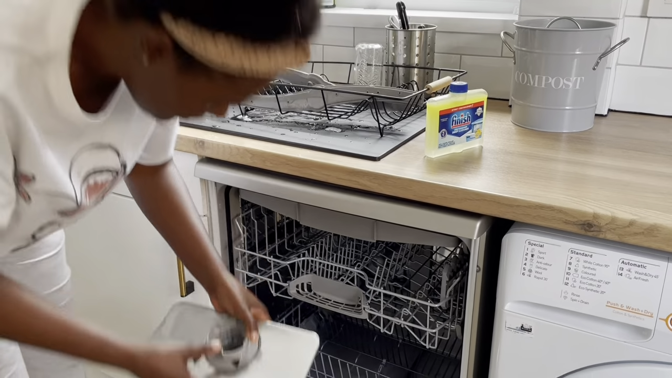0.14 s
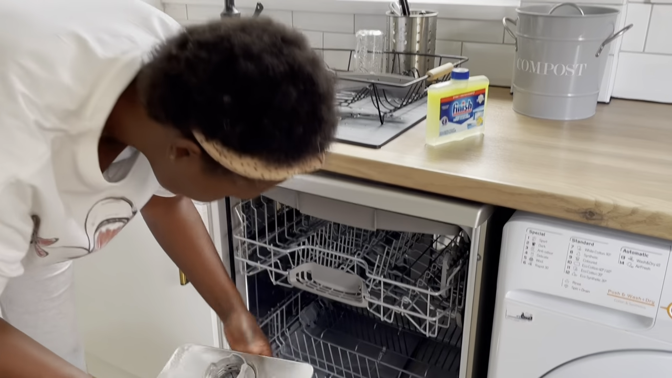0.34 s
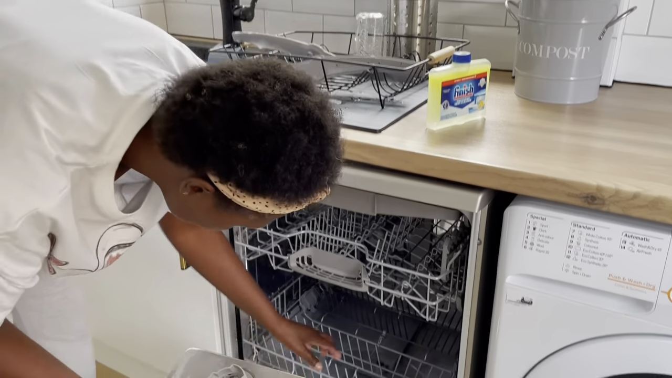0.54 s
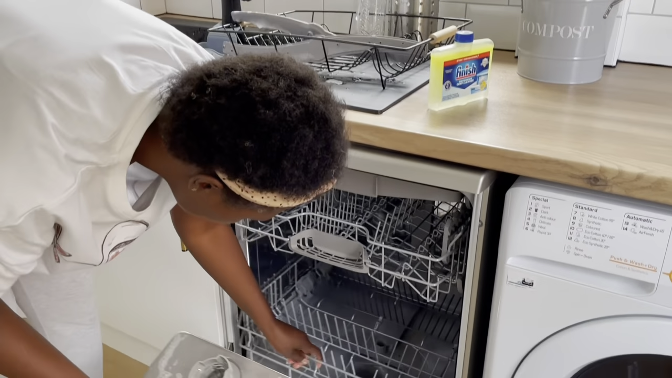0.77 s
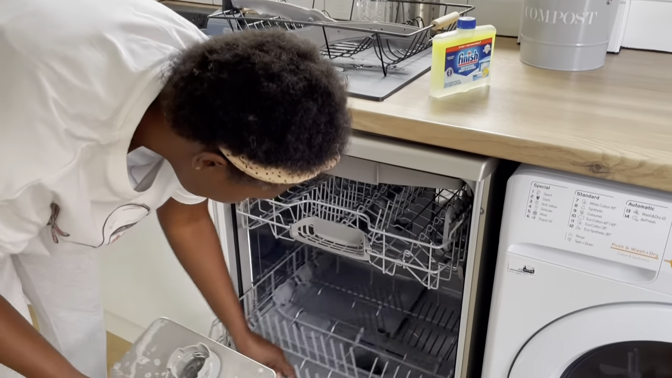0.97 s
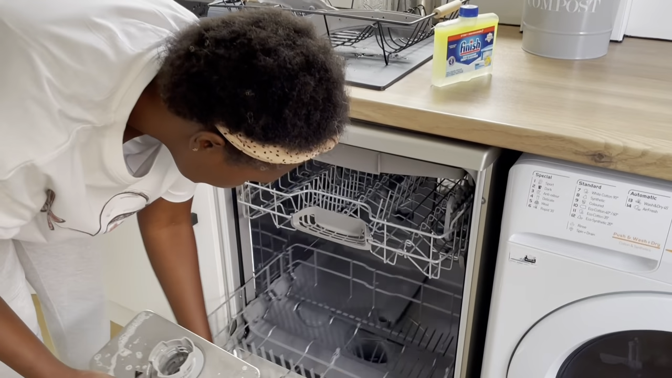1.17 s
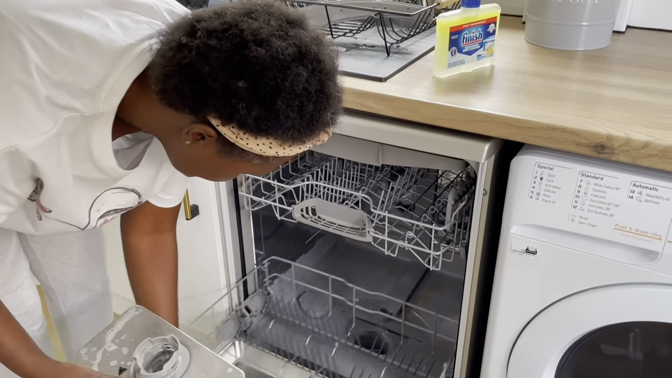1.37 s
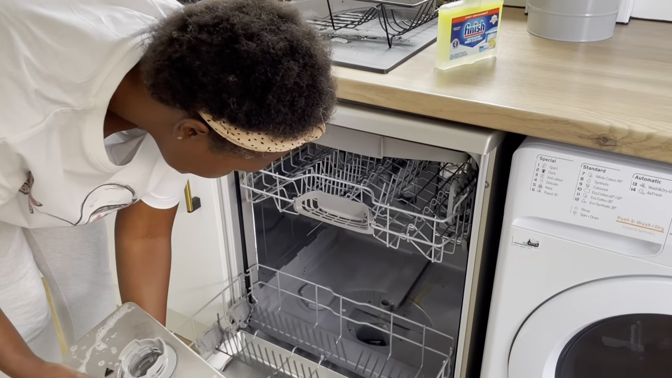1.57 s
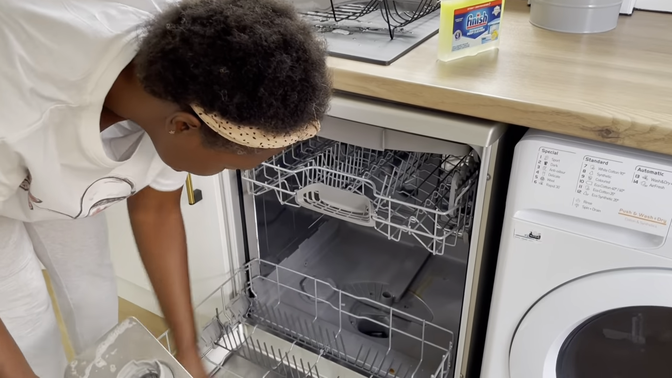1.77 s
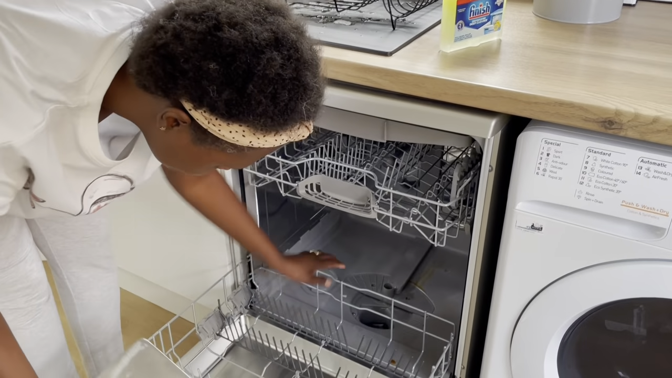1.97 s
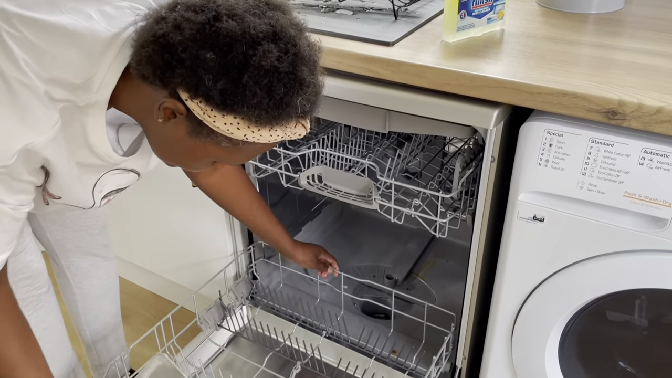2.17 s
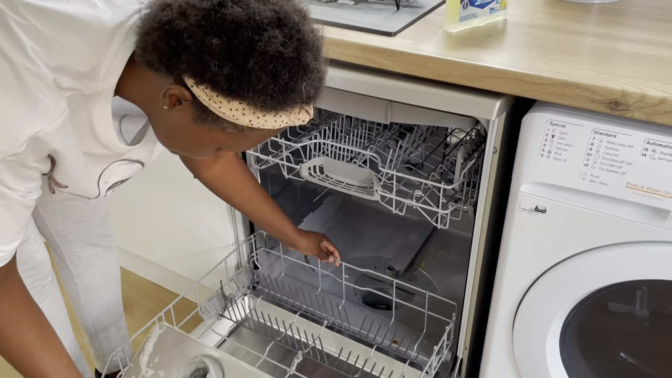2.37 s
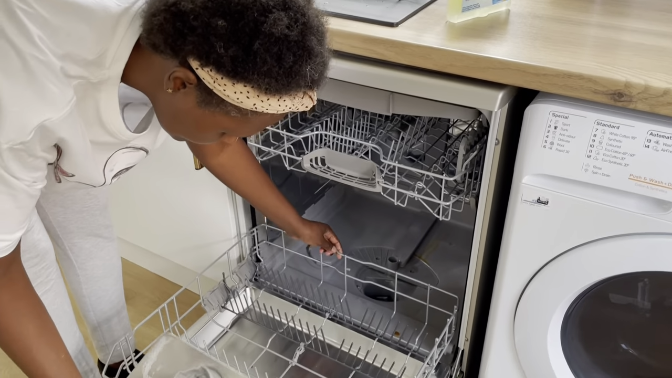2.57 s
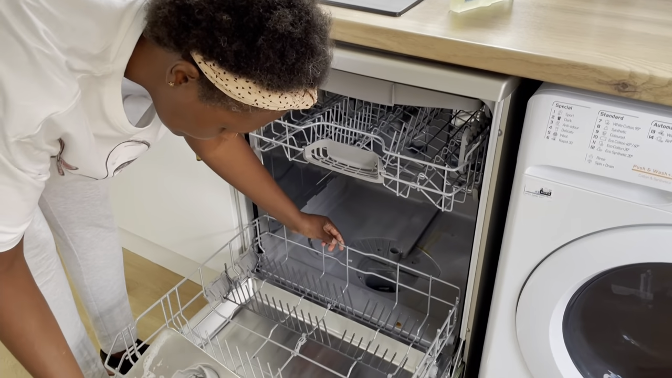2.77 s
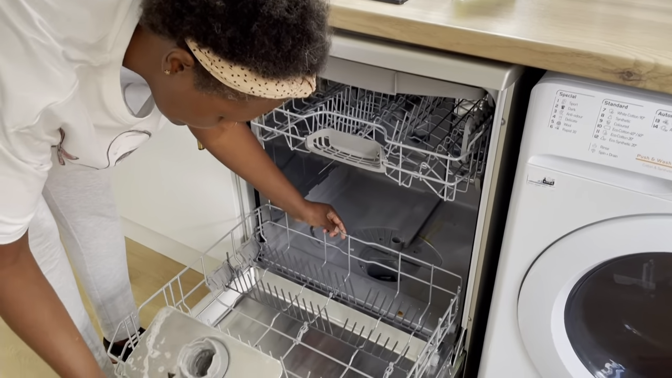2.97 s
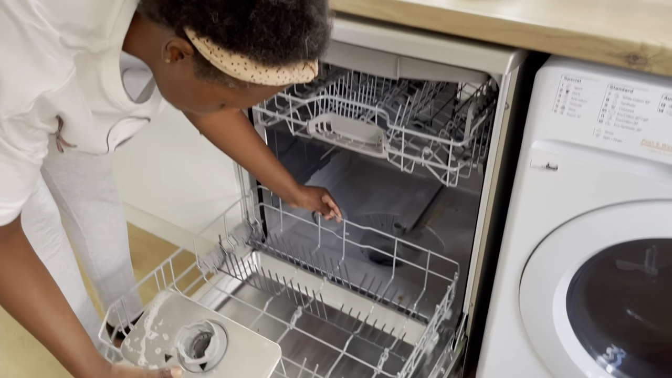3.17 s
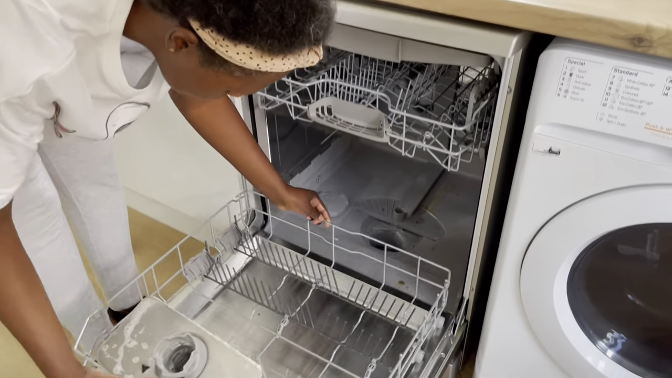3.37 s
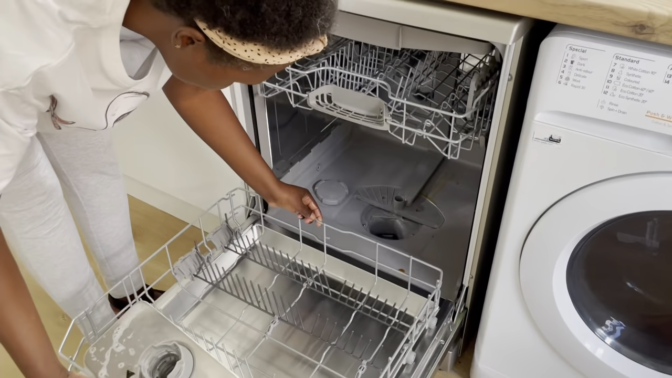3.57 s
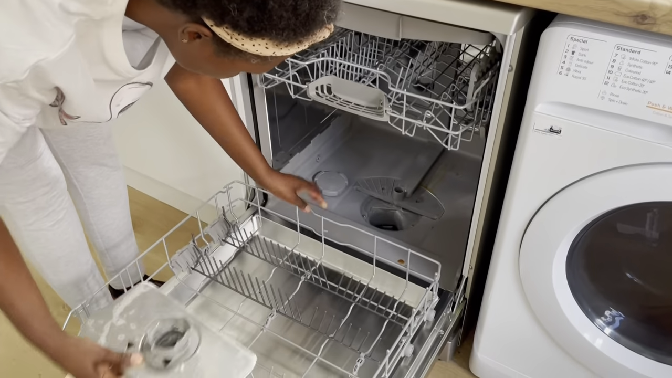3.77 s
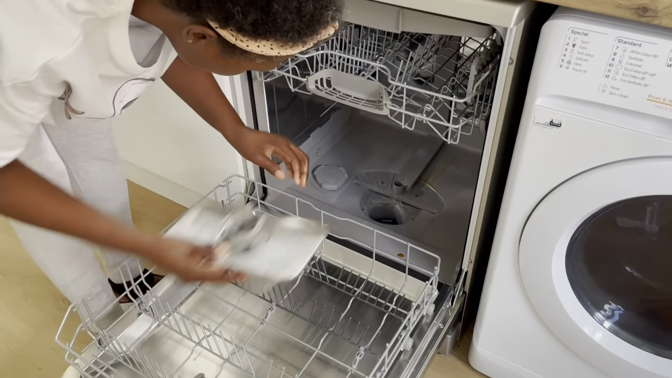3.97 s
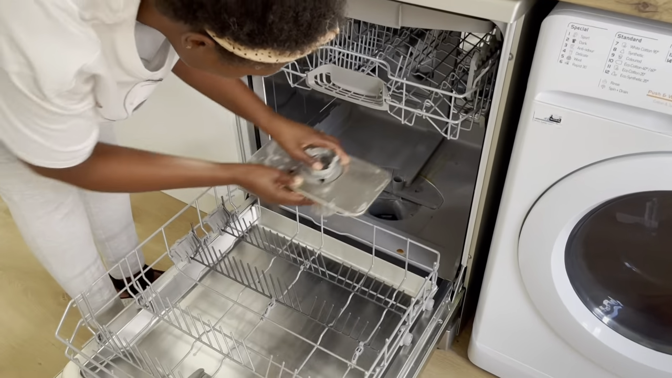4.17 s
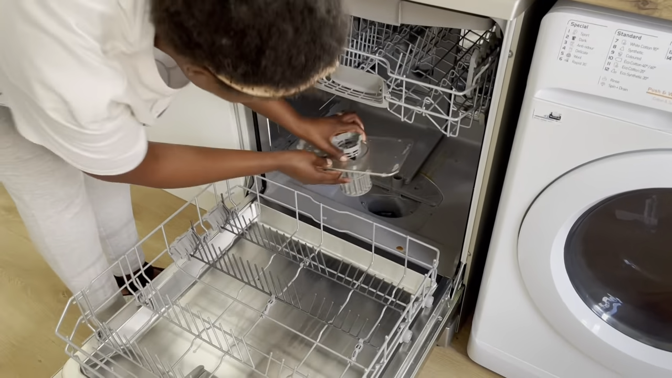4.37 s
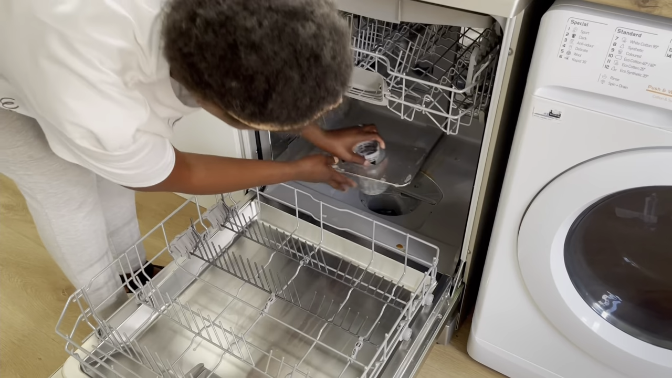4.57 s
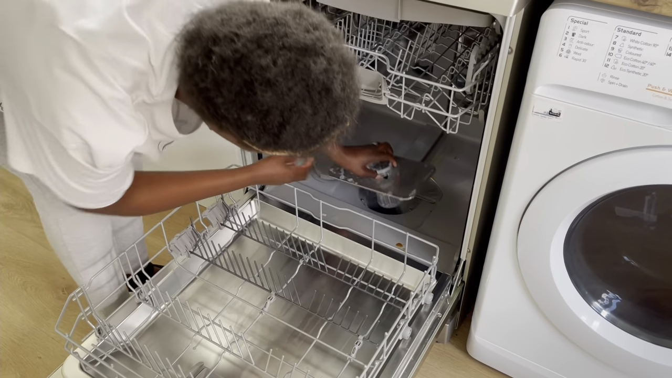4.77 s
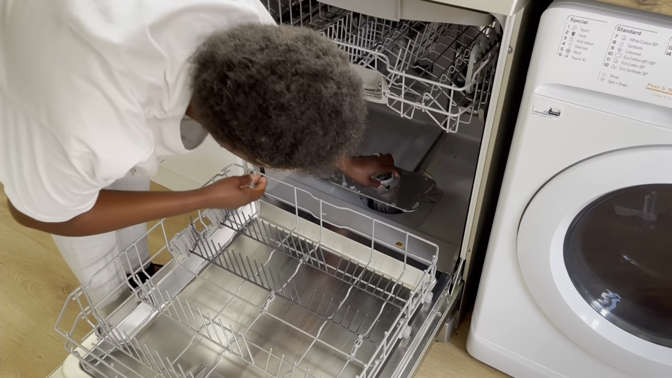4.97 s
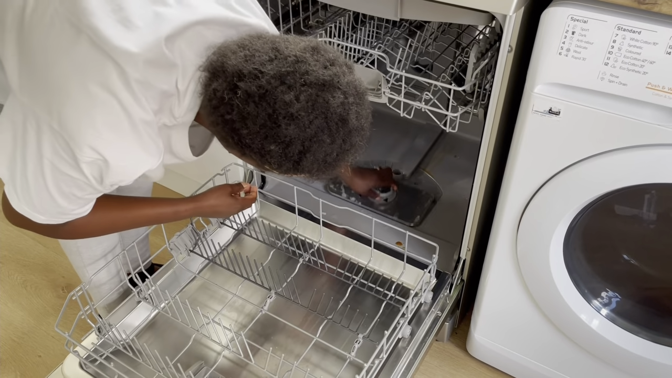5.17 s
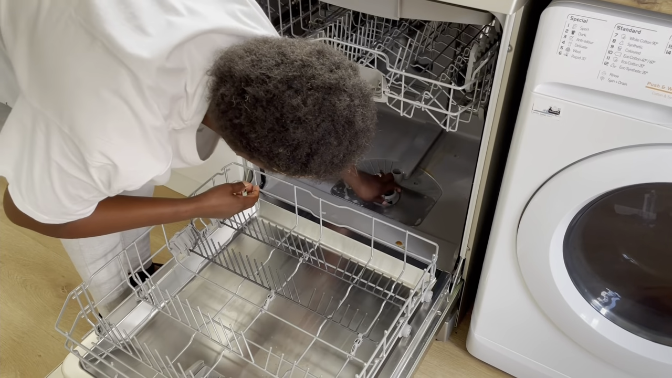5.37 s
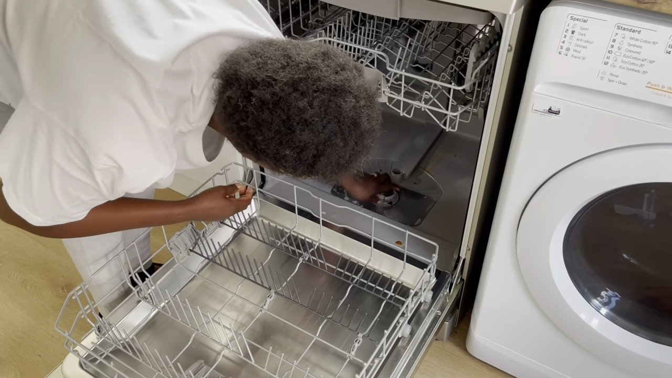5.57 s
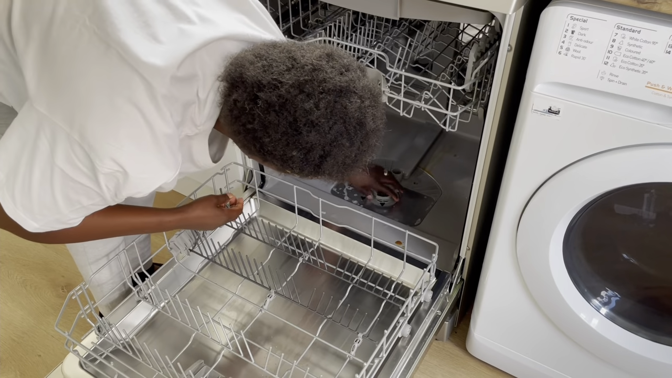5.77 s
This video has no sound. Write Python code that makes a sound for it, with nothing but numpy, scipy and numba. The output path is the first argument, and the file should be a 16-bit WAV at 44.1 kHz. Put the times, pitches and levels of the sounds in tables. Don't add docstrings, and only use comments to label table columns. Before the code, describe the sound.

In an echoing kitchen, a metal rack rolls and rattles out of a dishwasher, is jogged, and a plastic part knocks and scrapes home.

```python
import sys
import numpy as np
from scipy import signal
from scipy.fft import rfft, irfft
from scipy.io import wavfile
from scipy.ndimage import uniform_filter1d
from numba import njit

SR = 44100
rng = np.random.default_rng(int(sys.argv[2]) if len(sys.argv) > 2 else 0)


def gain_from_db(level_db):
    decades = np.asarray(level_db, float) / 20
    return 10 ** decades


def master_out(mix):
    frames = np.transpose(np.atleast_2d(mix))
    ceiling = np.clip(frames, -1, 1)
    pcm = np.round(ceiling * 32767).astype(np.int16)
    wavfile.write(sys.argv[1], SR, pcm)


N = 256662

# t/s, clack peak level/dB, tub boom/dB re clack,
# crack/dB re clack, boom pitch f/Hz
JOGS = [
    (2.13, -24, 2.5, -7.5, 568),
    (2.64, -23.5, -3, -2.5, 196),
    (3.416, -25.5, 7, -3, 145),
    (3.47, -24.5, -4.5, -8.5, 225),
]
LANDINGS = [
    (2.58, -25.5, 5, -17.5, 670),
    (3.277, -24, 3.5, -9, 540),
    (3.384, -16.5, 3.5, -16.5, 620),
]
CLACKS = [(5.068, -32, 1, -21, 555), (5.094, -34, 3.5, -18, 567), (5.118, -30.5, -5, -4.5, 73),
          (5.23, -13.5, 2.5, -3.5, 364), (5.237, -20, 5, -8.5, 367), (5.248, -27.5, -6, -14, 278),
          (5.272, -17.5, 0.5, -53, 465), (5.294, -20, 4, -8.5, 348), (5.304, -22.5, -2.5, -34, 307),
          (5.329, -20.5, 8, -39, 516), (5.357, -19, -3, -24, 374), (5.63, -38, -13, -24, 327)]
TRIPS = [(0.712, -42.5, 7.5, -48, 510), (0.796, -40.5, -19, -33, 116), (0.822, -39, -22, -23, 320),
         (0.864, -33, 4, -28, 403), (0.926, -37.5, -13, -10, 102), (0.953, -24, -30, -19, 592),
         (0.966, -25.5, -10, -13, 158), (1.455, -41, 2, -8.5, 83), (3.63, -43.5, 13.5, -24, 270),
         (4.024, -46, 1, -15, 238), (4.284, -51, 4, -9, 458), (4.393, -47, -17, -5.5, 261),
         (5.179, -23.5, -11, 1.5, 584)]
TAPS = [(0.022, -49.5, 21, -12, 390), (0.078, -45.5, 16, 0.5, 355), (0.184, -23.5, -1.5, -11, 383),
        (0.434, -37.5, 2.5, -5.5, 354), (0.719, -52, 14, -26, 390), (1.557, -34, 2, -15, 370),
        (2.01, -55.5, -21, 8.5, 244), (2.881, -43, 5, -16, 256), (3.929, -36.5, -2.5, -20, 238),
        (4.109, -37.5, -13, -1.5, 538), (4.122, -35.5, -4, -1, 407), (4.538, -48, 0, 1.5, 413),
        (5.583, -18.5, 3, -27.5, 508), (5.596, -28, 9.5, -21, 254), (2.148, -24, 5, -20, 196)]

# f/Hz, level/dB, time to fall 60 dB t60/s
TUB_MODES = [(53.3, -5, 0.21), (71, -4.5, 0.14), (112.3, -2.5, 0.13), (140.8, -4.5, 0.13), (185, 2, 0.11),
             (194.9, -1, 0.31), (228.4, -0.5, 0.25), (243.5, -2.5, 0.11), (310.3, 0.5, 0.089),
             (338.5, -7.5, 0.21), (380, -3.5, 0.054), (447.3, 0, 0.072), (515.2, -7, 0.092),
             (634, 1.5, 0.021)]
WIRE_MODES = [(585, 0, .045), (640, 0, .045), (693, -1, .04), (789, -3, .04), (860, -3, .035),
              (960, -4, .035), (1096, -3, .03), (1260, -4, .03), (1376, -5, .025), (1500, -5, .025),
              (1680, -6, .025), (1880, -7, .02), (2050, -8, .02), (2250, -8, .02), (2450, -9, .02),
              (2650, -8, .02), (2900, -9, .015), (3200, -10, .015)]
# f/Hz, level/dB
MESH_COLOUR = [(300, -17.5), (600, 3.5), (1200, -2), (2500, -8.5), (4000, -18.5), (8000, -56)]
# f/Hz, level/dB
CRACK_COLOUR = [(710, -3), (1200, -49.5), (1770, -0.5), (1980, -15.5), (4650, -9.5), (6570, -14),
                (8310, -15.5), (10300, -19.5), (11700, -23.5), (13700, -30.5)]

# t/s, load level/dB, hardness/dB
RACK = [
    (0.68, -58, -3),
    (0.72, -53.5, 0.5),
    (0.91, -45.5, -7),
    (0.97, -43.5, -1.5),
    (1.12, -46, -0.5),
    (1.38, -43.5, -3.5),
    (1.49, -57.5, 5.5),
    (1.57, -40, -3),
    (1.662, -42.5, -25),
]
DOOR = [
    (1.659, -40.5, 11),
    (1.762, -29.5, 4.5),
    (1.9, -43.5, -34),
    (2.05, -45, -35),
    (2.13, -50, -20),
]
HANDLING = [
    (0.0, -41, 0),
    (0.14, -73, 12.5),
    (0.32, -65, 10.5),
    (0.43, -57.5, 17.5),
    (0.6, -98, -10),
]
REACH = [
    (3.9, -61, -6),
    (3.936, -61.5, 12),
    (4.096, -73, 1),
    (4.112, -56.5, 10.5),
    (4.28, -65.5, -3),
    (4.47, -61, 4),
    (4.56, -75.5, 14),
    (4.66, -59.5, -11),
    (5.02, -70.5, -14),
]
SEATING = [
    (5.062, -100, 12),
    (5.072, -57, 23),
    (5.17, -62, 10),
    (5.184, -52, 23.5),
    (5.274, -48, 16),
    (5.38, -42, -19),
    (5.502, -49, -55),
    (5.582, -44.5, 0.5),
    (5.82, -55, 2.5),
]
# t/s, level/dB, length/s, f/Hz
THUDS = [(0.21, -43, 0.012, 70), (0.48, -36.5, 0.023, 108), (0.65, -56, .018, 65),
         (2.62, -40.5, 0.015, 78.4), (3.3, -32.5, 0.019, 190), (3.33, -30.5, .012, 95),
         (2.175, -35, 0.027, 203), (4.78, -62.5, 0.11, 111), (5.118, -27.5, .011, 77),
         (5.248, -23, 0.015, 124), (5.381, -19.5, 0.015, 105), (5.429, -25, 0.0066, 115),
         (5.64, -21.5, .008, 245), (5.305, -21.5, 0.0093, 254), (3.4, -27, 0.0091, 200),
         (1.0, -36, .03, 149)]

# f/Hz, t60/s
ROOM_DECAY = [(100, 0.38), (400, 0.48), (1200, 0.56), (3000, 0.54), (7000, 0.38), (14000, 0.29)]
# t/s, level/dB
HISS_LEVEL = [(0, -82), (.65, -86), (.88, -83), (2.12, -84), (2.3, -94), (3.88, -97), (3.93, -88),
              (4.3, -84), (5.3, -85), (5.5, -90), (5.82, -81)]
# f/Hz, level/dB
AIR_COLOUR = [(40, 37.5), (100, 24.5), (300, 11.5), (1000, 7), (2500, 12), (5000, -1.5), (8000, 8),
              (11000, -0.5), (15000, -1.5), (16000, -44)]
# f/Hz, level/dB
PORT_DIFFERENCE = [(60, -18), (250, -11), (500, -4.5), (2000, -4), (4000, -5.5), (7000, -11), (9000, -18.5),
                   (16000, -22)]
# f/Hz, phase/rad
PORT_PHASE = [(0, 0), (700, .2), (4000, .4), (6400, -1), (7700, -2.8), (8900, -3.5), (10700, -5.8),
              (12500, -6.8), (13800, -8.5), (14600, -9.3), (16000, -9.5)]
# f/Hz, level/dB
MIC = [(20, -40), (42, -5), (65, -0.5), (16000, -1)]

TAP_RATTLE_S, TRIP_RATTLE_S, JOG_RATTLE_S, CLACK_RATTLE_S = 0.0068, 0.017, 0.03, 0.012
STEP_S, STEP_GAP_S, STEP_PEAK_S, STEP_RATTLE_S = 1.661, .0169, 1.75, 0.006
STEP_DB, STEP_SWELL_DB_S, HEAVY_DB, LIGHT_HZ, HEAVY_HZ = -29, 40, 4, 219, 119
FIZZ_DB, FIZZ_HZ, FIZZ_S = -8.5, 9100, 0.027
CONTACT_S, SOFTER_PER_DB = .0001, .36
DULL_PER_DB = .45
SNAP, SNAP_S = 2.02, 0.0031
SCRAPE_DB, SCRAPE_PER_DB = -19.5, 1.08
ROLL_THUD_DB, HAND_THUD_DB = -1, -17
SHAKE_DB, SHAKE_RISE_S, SHAKE_T60_S, SHAKE_THUD_DB = -14, 0.06, 1.47, -3
ROOM_DB = -1


def shape(x, points):
    hz, db = np.transpose(points)
    f = np.arange(x.shape[-1] // 2 + 1) * SR / x.shape[-1] + 1
    gain = gain_from_db(np.interp(np.log(f), np.log(hz), db))
    return irfft(rfft(x) * gain, x.shape[-1])


def unit(x):
    return x / np.sqrt(np.mean(x ** 2))


def curve(rows, column):
    rows = np.array(rows)
    return gain_from_db(np.interp(np.arange(N) / SR, rows[:, 0], rows[:, column], -200, -200))


@njit
def resonate(x, pole, gain):
    y = np.zeros(len(x))
    for k in range(len(pole)):
        z = 0j
        for i in range(len(x)):
            z = z * pole[k] + x[i]
            y[i] += gain[k] * z.imag
    return y


def ring(x, modes, scatter_db, detune):
    hz, db, t60 = np.transpose(modes)
    pitch, sign, strength = rng.standard_normal((3, len(hz)))
    swing = 2j * np.pi * hz * (1 + detune * pitch)
    decay = np.log(1000) / np.abs(t60)
    gain = np.sign(sign) * gain_from_db(db + scatter_db * strength)
    return resonate(x + 1e-18, np.exp((swing - decay) / SR), gain)


def contacts(count, per_s, spread_db):
    hit, sign, size = rng.random((3, count))
    return (hit < per_s / SR) * np.sign(sign - .5) * gain_from_db(-spread_db * np.log(size + .02))


def knocks():
    out = np.zeros((2, N + SR))
    t = np.arange(16000) / SR
    grit = unit(shape(rng.standard_normal(N + SR), CRACK_COLOUR))
    tips = unit(shape(grit, [(FIZZ_HZ / 1.34, -30), (FIZZ_HZ, 0)]))
    mesh = unit(shape(rng.standard_normal(N + SR), MESH_COLOUR))
    for s, db, boom_db, crack_db, rattle_s, boom_hz, fizz in strikes():
        start = int(s * SR)
        now = slice(start, start + len(t))
        fade = np.exp(-t / rattle_s)
        rattle = 0.52 * fade * contacts(len(t), 900, 2.38)
        rattle[0] = 1.1

        panel = np.array(TUB_MODES)
        panel[:, 1] -= 18 * np.abs(np.log2(panel[:, 0] / boom_hz))
        panel[:, 2] *= np.clip(rattle_s / 0.015, .4, 1.3)
        boom = ring(uniform_filter1d(rattle, size=30), panel, 4.54, 0.0067)

        wires = np.array(WIRE_MODES)
        wires[:, 1] += DULL_PER_DB * (crack_db + 24.5) * np.log2(wires[:, 0] / 1000)
        soft = 1 + int(CONTACT_S * SR * gain_from_db(-SOFTER_PER_DB * crack_db))
        push = np.hanning(soft + 2)[1:-1]
        clack = ring(np.convolve(rattle, push)[:len(t)], wires, 3, .04)

        dense = uniform_filter1d(mesh[now], size=1 + soft // 2)
        dense = .5 * (fade + 0.1 * np.exp(-t / 0.001)) * dense
        crack = grit[now] * (fade + SNAP * np.exp(-t / SNAP_S)) / 4
        crack = crack + fizz * tips[now] * np.exp(-t / FIZZ_S) / 4

        boom = gain_from_db(boom_db) * boom / np.abs(boom).max()
        out[0, now] += gain_from_db(db) * 0.57 * clack / np.abs(clack).max()
        out[1, now] += gain_from_db(db) * (dense + boom + gain_from_db(crack_db) * crack)
    return out[:, :N]


def strikes():
    k = np.arange(9)
    s = STEP_S + STEP_GAP_S * k
    heavy = (k % 2 == 0) & (k > 3)
    db = STEP_DB - STEP_SWELL_DB_S * np.abs(s - STEP_PEAK_S) + HEAVY_DB * heavy
    step = [(a, b, 1.2, -5 - 8 * h, HEAVY_HZ if h else LIGHT_HZ) for a, b, h in zip(s, db, heavy)]
    kinds = [(TAPS, TAP_RATTLE_S, 0), (TRIPS, TRIP_RATTLE_S, 0), (JOGS, JOG_RATTLE_S, 0),
             (CLACKS, CLACK_RATTLE_S, 0), (step, STEP_RATTLE_S, 0),
             (LANDINGS, CLACK_RATTLE_S, gain_from_db(FIZZ_DB))]
    return [(*row[:4], rattle_s, row[4], fizz) for rows, rattle_s, fizz in kinds for row in rows]


def rolling():
    tub = np.array(TUB_MODES) * [1, 1, .6]
    thud = unit(ring(contacts(N, 200, 2.0), tub[:4], 0, 0))
    rumble = unit(ring(uniform_filter1d(contacts(N, 500, 4.6), size=30), tub[4:], 0, 0))
    rattle = 0.31 * unit(ring(contacts(N, 1500, 5.1), WIRE_MODES, 0, 0))
    rattle = rattle + 0.31 * unit(shape(contacts(N, 2500, 2.8), MESH_COLOUR))
    scrape = unit(shape(contacts(N, 4000, 3.4), CRACK_COLOUR))
    out = shudder() * (rumble + gain_from_db(SHAKE_THUD_DB) * thud) + thuds()
    moves = [(HANDLING, HAND_THUD_DB), (RACK, ROLL_THUD_DB), (DOOR, ROLL_THUD_DB),
             (REACH, HAND_THUD_DB), (SEATING, ROLL_THUD_DB)]
    for rows, thud_db in moves:
        load, hard = curve(rows, 1), curve(rows, 2)
        low = rumble + gain_from_db(thud_db) * thud
        high = hard * rattle + gain_from_db(SCRAPE_DB) * hard ** SCRAPE_PER_DB * scrape
        out += load * (low + high)
    return gain_from_db(-0.5) * out


def shudder():
    power = 0
    for s, db, *_ in JOGS:
        since = np.clip(np.arange(N) / SR - s, 0, None)
        rise = np.clip(since / SHAKE_RISE_S, 0, 1)
        power = power + (gain_from_db(db + SHAKE_DB - 60 * since / SHAKE_T60_S) * rise) ** 2
    return np.sqrt(power)


def thuds():
    t = np.arange(N) / SR
    out = np.zeros(N)
    for s, db, length, hz in THUDS:
        swell = np.exp(-((t - s) / length) ** 2)
        out += gain_from_db(db) * swell * np.sin(2 * np.pi * hz * (t - s))
    return out


def kitchen(x):
    t = np.arange(SR) / SR
    hz, t60 = np.transpose(ROOM_DECAY)
    echo = 0
    for band in 60 * 2 ** np.arange(9.):
        around = [(band / 2, -40), (band / 1.6, -12), (band, 0), (band * 1.6, -12), (band * 2, -40)]
        noise = shape(rng.standard_normal((2, SR)), around)
        echo = echo + noise * gain_from_db(-60 * t / np.interp(np.log(band), np.log(hz), t60))
    even = rfft(echo * np.clip((t - .002) / 0.0017, 0, 1))
    echo = irfft(even / np.sqrt(uniform_filter1d(np.abs(even) ** 2, size=24) + 1e-9), SR)
    echo = shape(echo, [(80, -7.5), (300, -3.0), (1000, -2), (6000, 2.5), (14000, 1.5)])
    echo = echo * (t < .8)
    echo = echo / np.sqrt(np.sum(echo ** 2) / 2)
    return signal.fftconvolve(x[None], echo, axes=1)[:, :N]


def air_and_hiss():
    return gain_from_db(13.5) * curve(HISS_LEVEL, 1) * shape(rng.standard_normal((2, N)), AIR_COLOUR)


def scene():
    pings, clatter = knocks()
    clatter = clatter + rolling()
    echo_mid, echo_side = gain_from_db(ROOM_DB) * kitchen(clatter + .35 * pings)
    air_mid, air_side = air_and_hiss()
    mid = pings + clatter + echo_mid + air_mid
    side = shape(1.58 * echo_side + air_side, PORT_DIFFERENCE)
    return np.array([mid + side, mid - side])


def top_cut(x):
    return signal.sosfilt(signal.butter(12, 15800, fs=SR, output="sos"), x)


def record(dry):
    hz, turn = np.transpose(PORT_PHASE)
    turn = np.interp(np.arange(N // 2 + 1) * SR / N, hz, turn)
    opposite = np.exp(.5j * np.array([turn, -turn]))
    ports = irfft(rfft(shape(dry, MIC)) * opposite, N)
    mix = np.tanh(1.445 * ports) / 1.548
    return top_cut(mix)


dry = scene()
out = record(dry)
master_out(out)
```